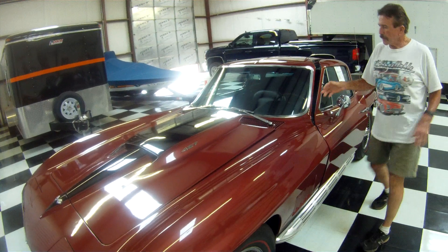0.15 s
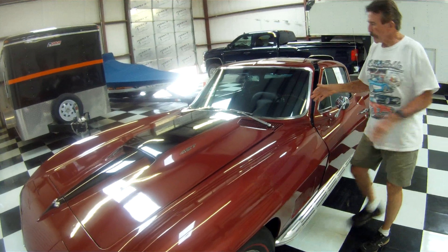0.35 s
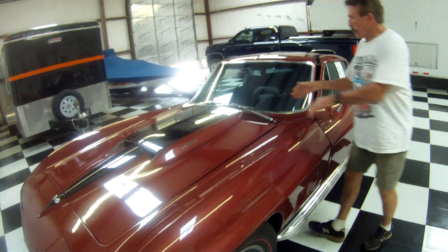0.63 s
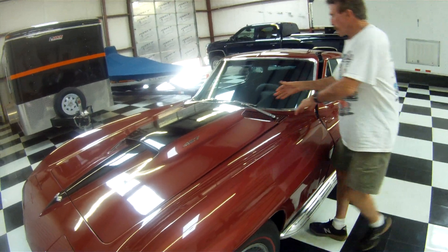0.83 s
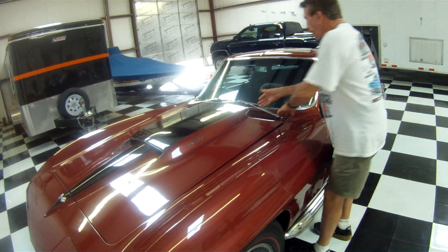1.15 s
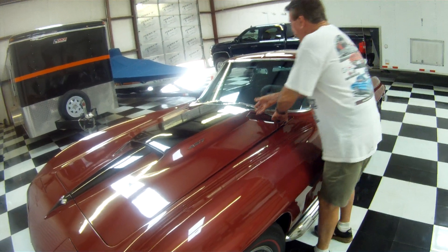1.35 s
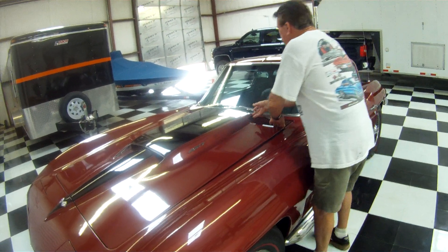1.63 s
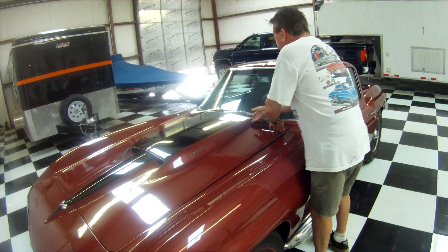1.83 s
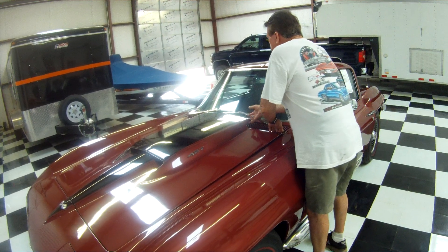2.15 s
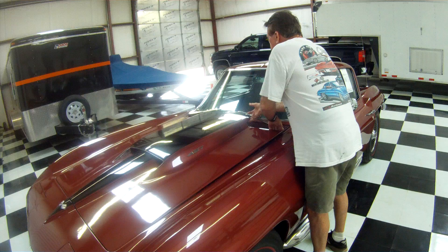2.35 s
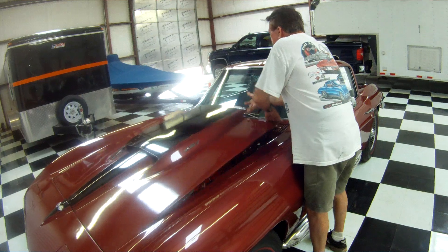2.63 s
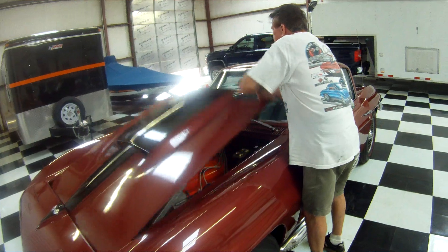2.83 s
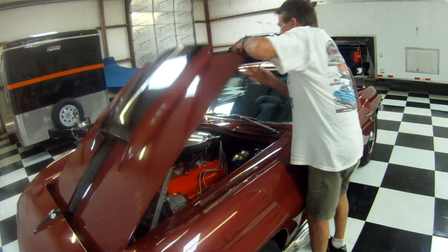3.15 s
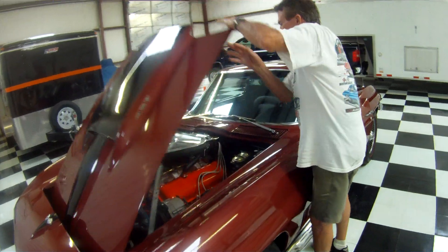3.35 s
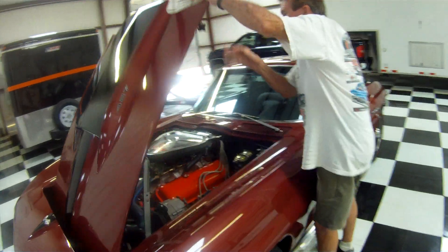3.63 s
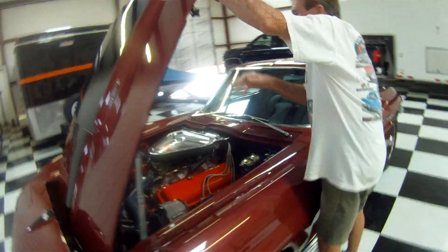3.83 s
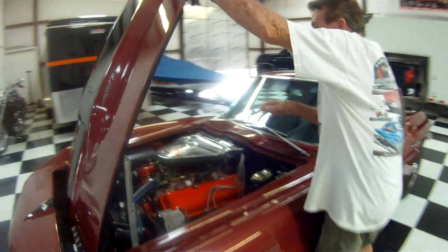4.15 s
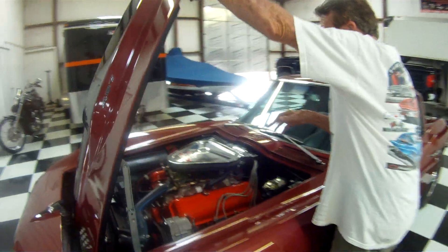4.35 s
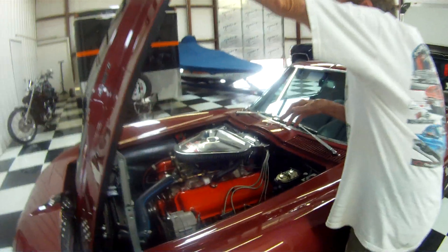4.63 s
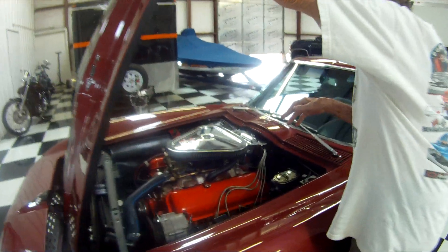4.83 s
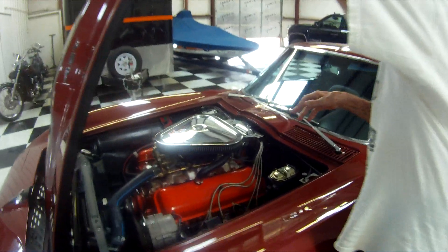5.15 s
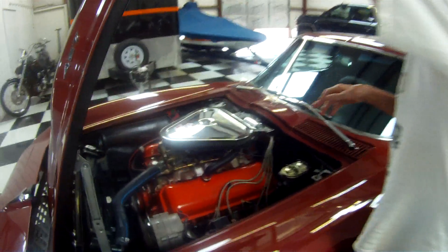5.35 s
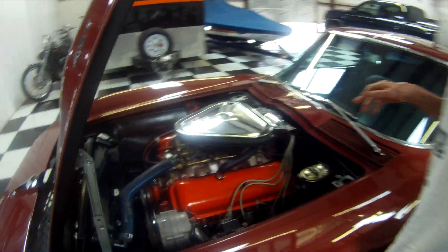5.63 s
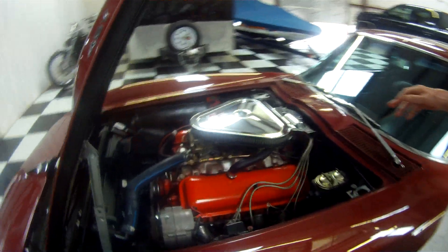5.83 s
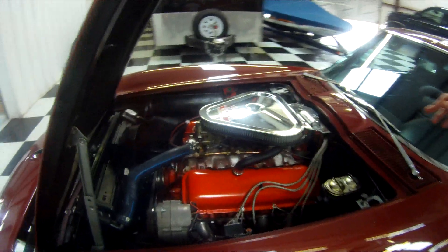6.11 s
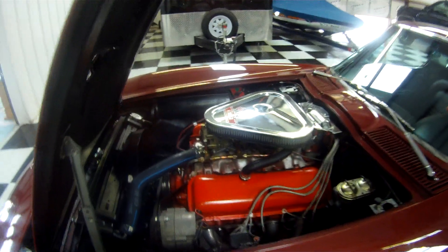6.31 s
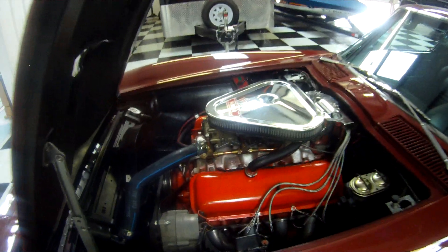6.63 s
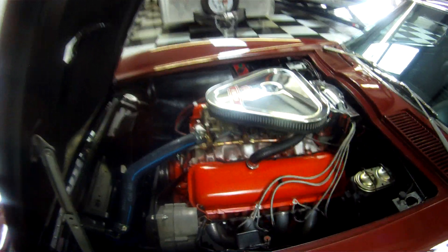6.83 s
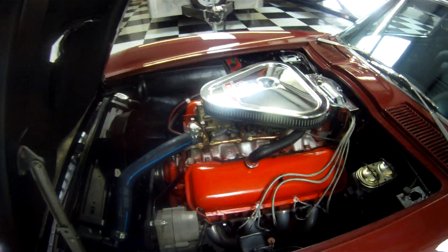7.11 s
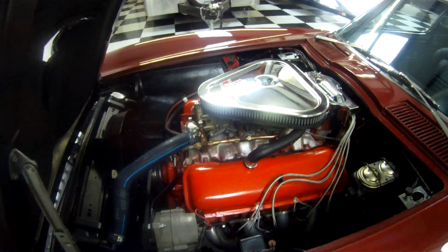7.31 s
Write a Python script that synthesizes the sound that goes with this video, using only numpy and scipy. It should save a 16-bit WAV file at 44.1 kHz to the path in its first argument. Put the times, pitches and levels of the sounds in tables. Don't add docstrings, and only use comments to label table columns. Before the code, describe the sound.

Quiet, roomy garage, nearly mono, with steady low air rumble and gritty camera hiss. From 0 to about 1.2 s a far motor drones low, around 96 Hz with overtones, swelling until 0.7 s and then dropping away. Very faint taps and squeaks come at 1.0-1.1 s, and a soft finger tap at 1.5 s. The latch works at 2.06-2.26 s, with a sharp hollow clack at 2.18, and again at 2.4-2.53 s, strongest near 2.48; the sheet metal rings briefly with short echo. Low air stirs as the hood rises, with a heave at 2.84, dull bumps at 3.1-3.3 and 3.55 s. At 4.02 s a jolt to the camera bursts as a very loud, clipped thump; a smaller jolt at 4.3 s, then bumps at 4.36-4.4 s. A light tick at 4.73, a clearer tick with a bump at 5.77-5.8 s, then faint handling creaks and scrapes over hiss until about 7.4 s.

```python
import sys
import numpy as np
from scipy import signal
from scipy.io import wavfile
from scipy.ndimage import uniform_filter1d

SR = 44100
rng = np.random.default_rng(int(sys.argv[2]) if len(sys.argv) > 2 else 0)


def level_to_linear(level):
    exponent = np.asarray(level, float) / 20
    return 10 ** exponent


def digitize_waveform(pressure):
    field = np.atleast_2d(pressure).T
    bounded = np.clip(field, -1, 1)
    quanta = np.round(bounded * 32767).astype(np.int16)
    wavfile.write(sys.argv[1], SR, quanta)


N = 329427


def evened(x):
    return x / np.sqrt(np.mean(x ** 2) + 1e-20)


def read(points, hz):
    point_hz, value = np.transpose(points)
    return np.interp(np.log(hz + 1), np.log(point_hz + 1), value)


def add(mix, start_s, sound):
    part = mix[round(start_s * SR):][:len(sound)]
    part += sound[:len(part)]


def wobble(rate_hz):
    bumps = uniform_filter1d(rng.standard_normal(N), 300)
    return evened(signal.lfilter([1], [1, -np.exp(-2 * np.pi * rate_hz / SR)], bumps))


def noise(colour, patchy_db):
    frames, hz = N // 256 + 5, np.fft.rfftfreq(1024, 1 / SR)
    real, imaginary, patches = rng.standard_normal((frames, 513, 3)).T
    patches = uniform_filter1d(patches, size=8, axis=0)
    patches = evened(uniform_filter1d(patches, size=10, axis=1))
    level_db = read(colour, hz)[:, None] + patchy_db * patches
    spectra = (real + 1j * imaginary) * level_to_linear(level_db)
    return evened(signal.istft(spectra, nperseg=1024, noverlap=768)[1][:N])


def resonate(x, hz, width_hz):
    return signal.lfilter(*signal.iirpeak(hz, hz / width_hz, SR), x)


# pitch_hz, level_db, fade_s (time to fall 60 dB)
PANEL_TONES = [(87, -0.5, 0.088), (127, -5.5, 0.16), (171.5, -3.5, 0.19), (244, -2.5, 0.079),
               (322.4, -4.5, 0.092), (411.7, -3.5, .1), (536.3, 1, 0.088), (651, 1, 0.048),
               (740, -4, 0.029), (830, -3, 0.09), (965, -12.5, 0.08), (1022, -5.5, 0.15), (1207, 0, 0.034),
               (1593, -11, 0.059)]
# pitch_hz, width_hz, level_db
FITTINGS = [(1390, 700, 7.5), (2490, 340, 3), (3200, 310, 1), (3610, 160, -8), (4800, 360, -25)]


def knock(peak_db, ring_hz, rattle_s, thud_db, hard_db, chance):
    t = np.arange(SR // 3) / SR
    tones = PANEL_TONES + [(ring_hz, 2.5, .05)]
    hz, tone_db, fade_s = np.repeat(tones, 3, axis=0).T
    hz = hz * (1 + .045 * chance[:len(hz)])
    near_spot = level_to_linear(-6. * np.log2(hz / ring_hz) ** 2)
    thud = level_to_linear(thud_db - 11.15 * np.log2(hz / 135) ** 2)

    rattle_s = max(rattle_s, .001)
    span = np.arange(2000) / SR / rattle_s
    contacts = abs(chance[100:2100]) ** 0.68 * np.sign(chance[2100:4100])
    contacts = contacts * (span + .08) * np.exp(-2.0 * span)

    taken = abs(np.exp(-2j * np.pi * hz[:, None] * t[:2000]) @ contacts)
    taken = taken + 0.28 * np.linalg.norm(contacts)
    waves = np.sin(2 * np.pi * hz[:, None] * t + chance[50:50 + len(hz), None])
    fading_waves = level_to_linear(-60 * t / fade_s[:, None]) * waves
    ring = ((near_spot + thud) * level_to_linear(tone_db) / taken) @ fading_waves
    soft_start = 1 - np.exp(-t / 0.00068)
    body = signal.fftconvolve(contacts, ring * soft_start)[:len(t)]

    shiver = 0.56 * np.exp(-t / 0.0033) + .5 * np.exp(-t / (3.25 * rattle_s))
    shiver = chance[-len(t):] * shiver
    crack = sum(level_to_linear(db) * resonate(shiver, hz, width_hz) for hz, width_hz, db in FITTINGS)
    crack = resonate(crack, hz=2240, width_hz=2800)
    return level_to_linear(peak_db - 1.0) * (body / abs(body).max() + level_to_linear(hard_db) * crack / abs(crack).max())


# start_s, peak_db, ring_hz, rattle_s
TAPS = [
    (1.49, -37.5, 340, 0.0052),
    (1.835, -50.5, 713, 0.021),
]
# start_s, peak_db, ring_hz, rattle_s
TICKS = [
    (2.094, -45, 730, .01),
    (2.599, -51, 670, .034),
    (3.441, -51.5, 627, .012),
    (4.734, -44.5, 735, 0.0067),
    (5.79, -39, 608, 0.0073),
]
# start_s, peak_db, ring_hz, rattle_s
BLOWS = [(1.042, -49.5, 1170, 0.0083), (1.117, -47, 293, .0063), (2.183, -28.5, 944, 0.018),
         (2.224, -38.5, 616, 0.015), (2.258, -48, 291, 0.022), (2.389, -45, 540, 0.02),
         (2.449, -37.5, 1110, 0.012), (2.476, -28, 643, 0.0098), (2.53, -41.5, 616, 0.028),
         (6.27, -56, 1100, 0.0047)]
# start_s, peak_db, ring_hz, rattle_s
HEAVES = [
    (2.064, -43, 719, .008),
    (2.841, -42, 680, 0.0066),
    (3.187, -46, 595, .021),
    (3.232, -47, 363, .022),
]
# start_s, peak_db, ring_hz, rattle_s
BUMPS = [(3.108, -43, 647, .027), (3.28, -43, 700, .035), (3.545, -49, 627, .006),
         (3.574, -45, 657, 0.0094), (4.356, -33.5, 814, 0.0081), (4.394, -38.5, 345, 0.01),
         (4.398, -32.5, 846, 0.0047), (4.418, -54, 294, .005), (5.767, -43.5, 417, 0.0063)]


def all_knocks():
    kinds = [(TAPS, -38, -30), (TICKS, -15, -8), (BLOWS, 0.61, -11),
             (HEAVES, 9, -25), (BUMPS, -4, -18.5)]
    knocks = sorted((*row, thud_db, hard_db) for table, thud_db, hard_db in kinds for row in table)
    out = np.zeros(N)
    chances = rng.standard_normal((len(knocks), SR // 2))
    for (start_s, *blow), chance in zip(knocks, chances):
        add(out, start_s, knock(*blow, chance))
    return out


# start_s, squeeze, squeeze_s, release, release_s
JOLTS = [(3.885, 0.016, 0.0051, 0.0094, 0.0014), (4.018, 0.68, 0.004, 0.39, 0.0011),
         (4.0214, 1.0, 0.002, 1.88, .00003), (4.049, 0.067, .0008, 0.16, 0.0011),
         (4.068, 0.0176, .0012, 0.035, 0.0045), (4.111, .001, 0.0014, .009, .0043),
         (4.298, 0.0011, 0.0013, 0.058, 0.002), (4.3081, 0.3, .0011, 0.068, .001),
         (4.3097, 0.26, .002, 0.052, .0015), (4.3138, 0.07, 0.0011, 0.12, 0.012)]
# start_s, height (signed), ring_hz, fade_s (time to fall 60 dB)
CREAKS = [(.76, .004, 4020, 0.0033), (1.0985, -.006, 400, 0.004), (4.0025, 0.025, 2605, 0.0017),
          (4.0079, -0.44, 2620, 0.0012), (4.031, -0.035, 4460, .001), (4.033, 0.42, 4300, 0.0014),
          (4.3098, -0.04, 1830, 0.013), (4.313, 0.0057, 1500, 0.0045), (4.3215, 0.025, 2100, .005),
          (4.0495, .012, 2480, .001), (4.395, -0.014, 4450, 0.0014), (5.098, .007, 1500, 0.0013),
          (6.555, .005, 3200, .004), (6.584, -.006, 2600, 0.0017), (6.273, .005, 1340, 0.0063),
          (6.6273, 0.032, 300, 0.0016), (7.11, 0.007, 350, 0.006)]


def handling():
    port_hz, damping = 62, 0.86
    hold_share = .52
    slope, creaks = np.zeros(N), np.zeros(N)
    for start_s, squeeze, squeeze_s, release, release_s in JOLTS:
        tighten = np.hanning(round(squeeze_s * SR) + 3)
        hold = np.zeros(round(hold_share * squeeze_s * SR))
        let_go = np.hanning(max(round(release_s * SR), 1) + 2)
        push = squeeze * tighten / tighten.sum()
        add(slope, start_s, np.r_[push, hold, -release * let_go / let_go.sum()])
    t = np.arange(400) / SR
    for start_s, height, hz, fade_s in CREAKS:
        add(creaks, start_s, height * np.cos(2 * np.pi * hz * t) * level_to_linear(-60 * t / fade_s))
    w = 2 * np.pi * port_hz
    port = signal.bilinear([1, 0, 0], [1, 2 * damping * w, w * w], SR)
    return creaks + signal.lfilter(*port, np.cumsum(slope))


def rub(length_s, level_db, hz, width_hz, grit):
    clumps = uniform_filter1d(abs(grit[::-1]) ** 3, size=200) ** .6
    slips = (grit * abs(grit) ** 0.84 * clumps)[:round(length_s * SR)]
    band = resonate(resonate(slips, hz, width_hz), hz, 1.5 * width_hz)
    return level_to_linear(level_db) * evened(band) * signal.windows.tukey(len(slips), .5)


# start_s, length_s, level_db, pitch_hz
SQUEAKS = [(1.029, 0.013, -62, 4970), (1.094, 0.033, -59, 5060), (1.445, 0.17, -69, 5040),
           (1.491, .045, -59, 615), (1.497, .075, -54, 304), (2.955, 0.065, -59, 1020),
           (3.003, 0.063, -61, 1040), (3.569, 0.033, -56, 312), (4.205, 0.01, -62.5, 2480),
           (4.355, .0078, -59, 4800)]
# start_s, length_s, level_db, pitch_hz
SHUFFLES = [(1.359, 0.064, -58, 117), (2.94, 0.091, -56, 90), (2.05, .12, -51.5, 140),
            (2.2, .063, -50, 152), (2.5, .14, -50.5, 140), (3.191, 0.073, -50, 165),
            (4.397, .056, -53, 300), (5.797, 0.031, -46, 266)]
# start_s, length_s, level_db, pitch_hz
SCRAPES = [(1.021, 0.035, -64, 2380), (4.0189, 0.0064, -28.5, 885), (4.287, .045, -47.5, 1190),
           (4.298, 0.013, -38.5, 416), (4.308, 0.0082, -47, 1830), (5.788, 0.0086, -53.5, 2860),
           (6.482, .028, -61.5, 3000), (6.519, 0.085, -63.5, 2720), (7.104, .08, -63, 2620),
           (7.222, 0.043, -60.5, 2600)]


def all_rubs():
    kinds = [(SQUEAKS, .17), (SHUFFLES, 0.34), (SCRAPES, 1.05)]
    strokes = [(*row, share * row[-1]) for table, share in kinds for row in table]
    out = np.zeros(N)
    grits = rng.laplace(size=(len(strokes), SR // 4))
    for (start_s, *stroke), grit in zip(strokes, grits):
        add(out, start_s, rub(*stroke, grit))
    return out


# start_s, level_db (of the lowest tone)
MOTOR_LEVEL = [
    (0.0, -53),
    (.1, -51.5),
    (.66, -50.5),
    (.95, -60.5),
    (1.03, -58),
    (1.13, -59),
    (1.19, -79),
    (1.3, -100),
]
# multiple (of the firing pitch), level_db
MOTOR_TONES = [(1, 1), (2, -8.5), (3, -18.5), (4, -29), (5, -26.5), (6, -20), (7, -26), (8, -24),
               (9, -31.5), (10, -28.5), (11, -40), (12, -29.5)]


def motor():
    firing_hz = 95.7
    t = np.arange(N) / SR
    turns = np.cumsum(firing_hz * (1 + .003 * wobble(13.6))) / SR
    pipe_hz = 730 - 60 * t + 45 * wobble(3.1)
    tones = np.zeros(N)
    for multiple, level_db in MOTOR_TONES:
        fading_db = 0.58 * np.log2(multiple + 1) * wobble(6)
        pipe_db = 6.2 * np.exp(-((firing_hz * multiple - pipe_hz) / 110) ** 2)
        wave = np.cos(2 * np.pi * (multiple * turns + rng.random()))
        tones += level_to_linear(level_db + fading_db + pipe_db) * wave
    return np.sqrt(2) * tones * level_to_linear(np.interp(t, *np.transpose(MOTOR_LEVEL)))


# start_s, level_db
STIR_LEVEL = [(0.0, -55), (.79, -54), (1.3, -65), (1.85, -58.5), (2.2, -54), (2.39, -47.5), (2.68, -55.5),
              (2.95, -51.5), (3.35, -55), (4.39, -57.5), (4.58, -63), (5.14, -61), (5.51, -63.5),
              (6.1, -60), (7.47, -59.5)]
# pitch_hz, level_db
STIR_COLOUR = [(30, -25.5), (70, -7.5), (150, 1.5), (400, -10), (750, -7.5), (1200, -12), (1800, -31.5),
               (3000, -51.5)]


def stir():
    level_db = np.interp(np.arange(N) / SR, *np.transpose(STIR_LEVEL))
    return noise(STIR_COLOUR, patchy_db=3.) * level_to_linear(level_db - 6.5 + 1.1 * wobble(14))


# pitch_hz, level_db (per Hz)
AIR_COLOUR = [(12, -32.5), (20, -5), (38, -2.5), (92, -2), (179, -12), (238, -11.5), (324, -11.5),
              (559, -18), (744, -18), (1260, -22.5), (4540, -28), (5900, -31), (7670, -69), (13000, -120)]


def air():
    return level_to_linear(-57 - 1.5) * noise(AIR_COLOUR, patchy_db=1.22)


# pitch_hz, fade_s (time to fall 60 dB)
GARAGE_FADE = [(100, 0.96), (500, 0.24), (1500, 0.25), (5000, 0.42)]


def garage(x):
    echoes = np.zeros(SR)
    at = np.arange(500, SR - 20, 20)
    echoes[at + rng.integers(0, 20, len(at))] = rng.choice([-1., 1.], len(at))
    hz, t, spectra = signal.stft(echoes, SR, nperseg=256)
    fade = level_to_linear(-60 * t / read(GARAGE_FADE, hz)[:, None])
    tail = signal.istft(spectra * fade, SR, nperseg=256)[1]
    return signal.fftconvolve(x, tail / np.linalg.norm(tail))[:N]


def scene():
    knocks = all_knocks()
    mono = knocks + level_to_linear(-3.5) * garage(knocks) + handling() + all_rubs() + motor() + stir() + air()
    return np.array([mono, mono])


def band_limit(x):
    return signal.sosfilt(signal.butter(12, 16400, fs=SR, output="sos"), x)


# pitch_hz, level_db (per Hz)
SIDE_COLOUR = [(12, -48), (20, -18), (135, -9), (352, -4), (1490, -2), (4900, -3.5), (6030, -9.5),
               (9600, -11.5), (12500, -40), (21100, -120)]


def record(dry):
    smooth = signal.oaconvolve(dry, signal.firwin(161, 5550, fs=SR)[None], "same")

    fall_db = np.arange(N) * 620.0 / SR
    over_db = 20 * np.log10(abs(smooth[0]) + 1e-9) + 14.0
    over_db = np.maximum(np.maximum.accumulate(over_db + fall_db) - fall_db, 0)
    late_db = np.r_[np.zeros(500), uniform_filter1d(over_db, size=400)][:N]
    ducked = smooth / level_to_linear(late_db)

    slow = signal.resample_poly(ducked, 40, 147, axis=1, window=("kaiser", 1))
    slow = slow + level_to_linear(-79.5) * rng.standard_normal(slow.shape[1])
    held = np.repeat(np.clip(slow, -1, 1), 4, axis=1)
    back = signal.resample_poly(held, 147, 160, axis=1)[:, :N]
    top_cut = signal.firwin(511, 15450, window=("kaiser", 8), fs=SR)
    back = signal.oaconvolve(back, top_cut[None], "same")

    side = level_to_linear(-79) * noise(SIDE_COLOUR, patchy_db=-1.0) + 0.0081 * back
    mix = np.clip(back + side * [[1], [-1]], -1, 1)
    return band_limit(mix)


dry = scene()
out = record(dry)
digitize_waveform(out)
```